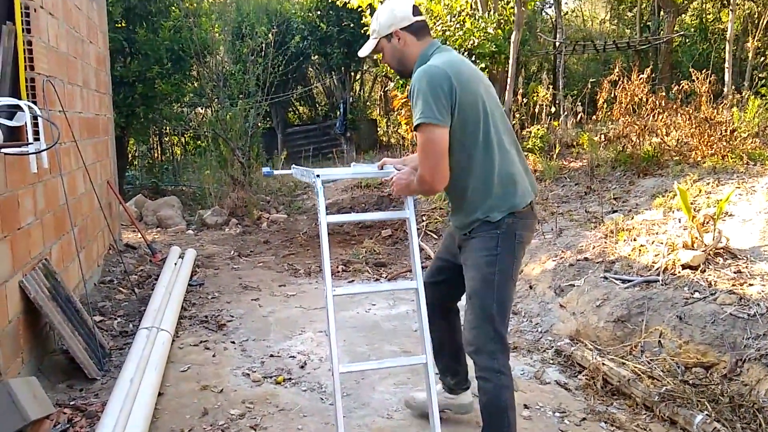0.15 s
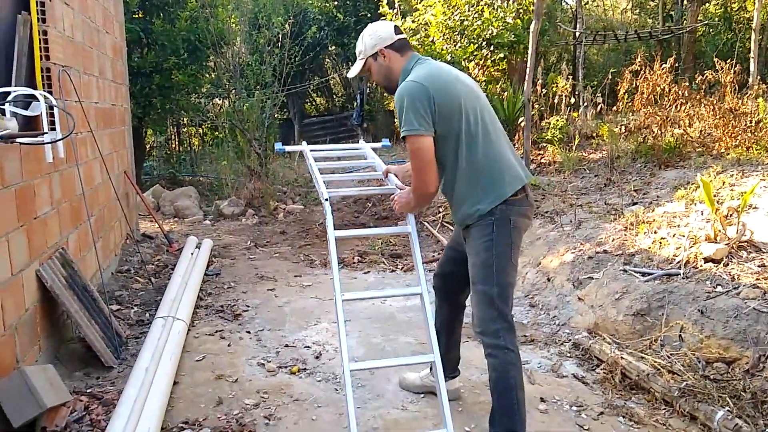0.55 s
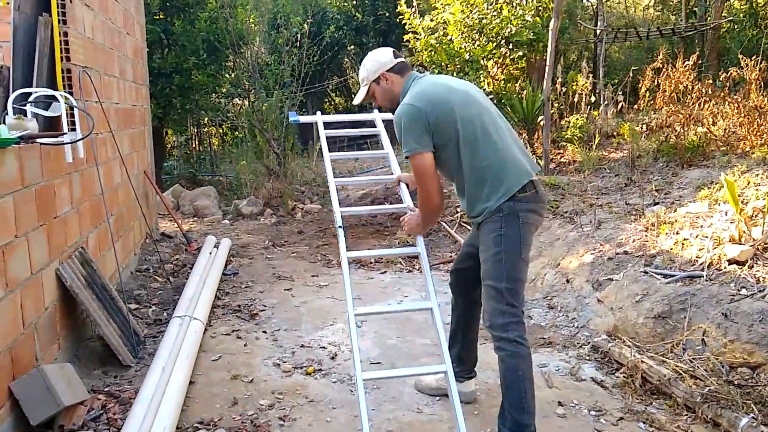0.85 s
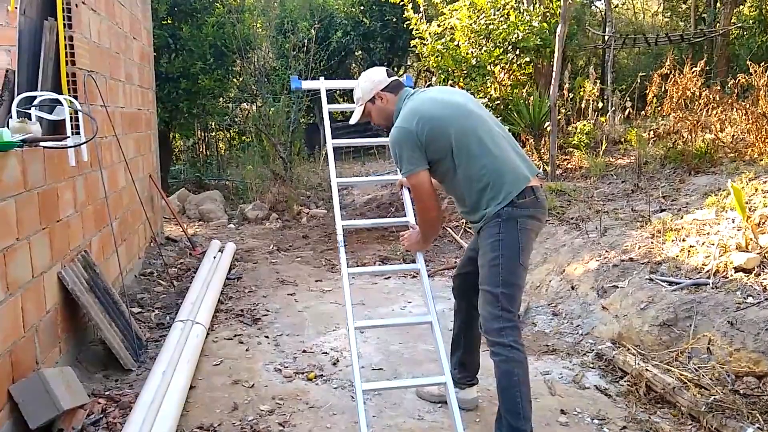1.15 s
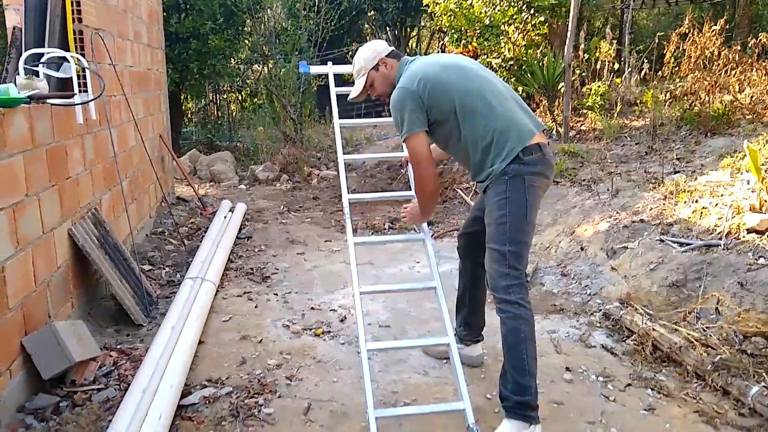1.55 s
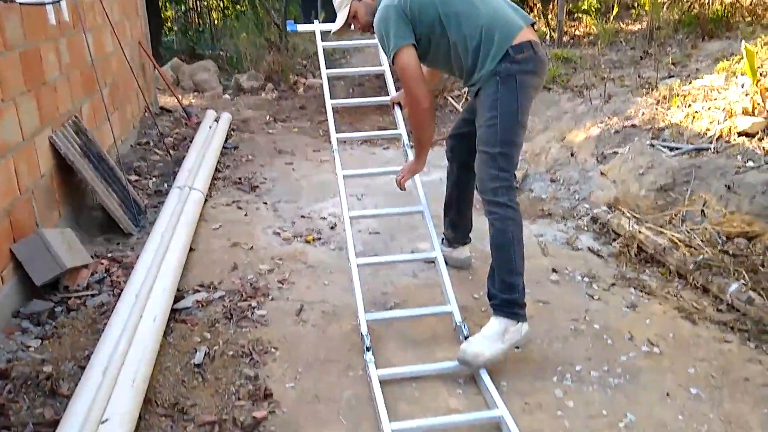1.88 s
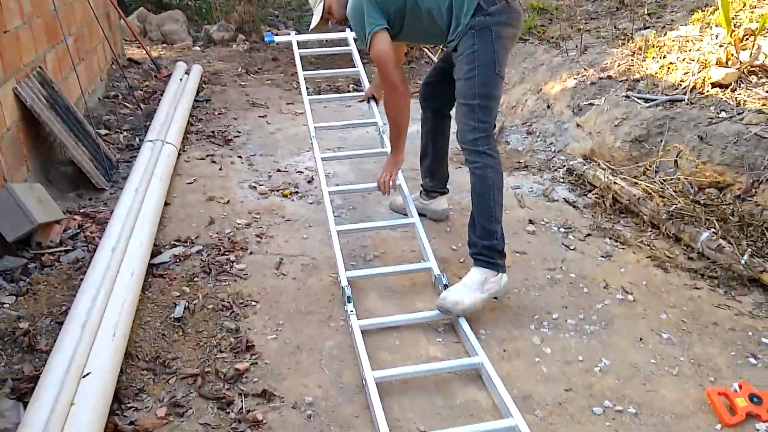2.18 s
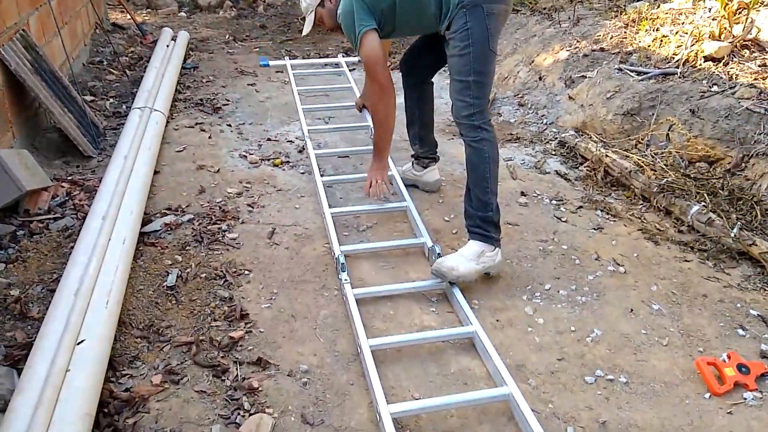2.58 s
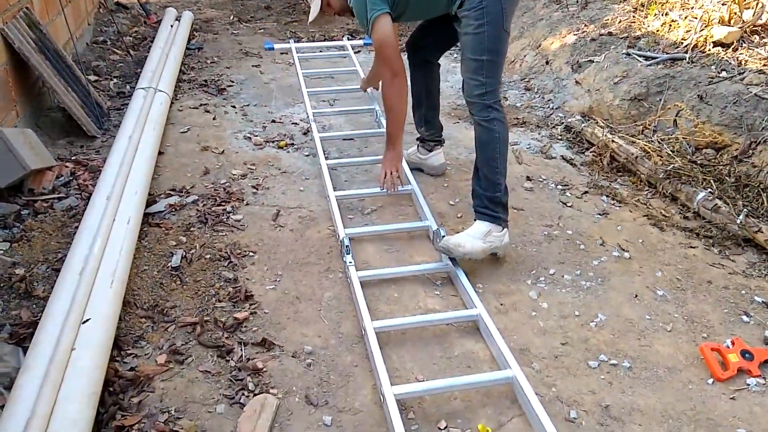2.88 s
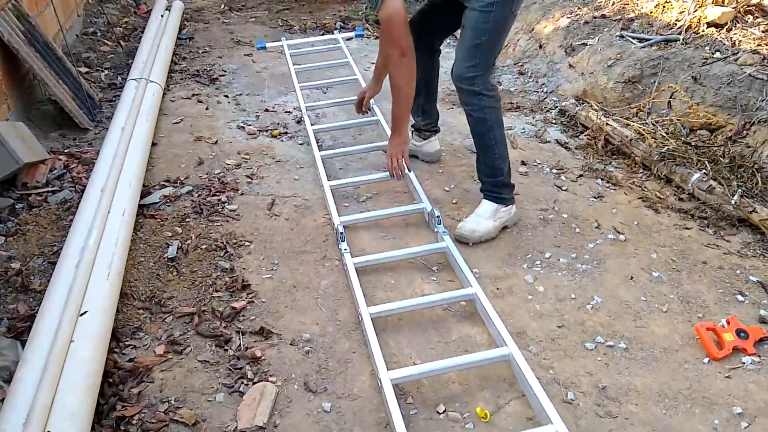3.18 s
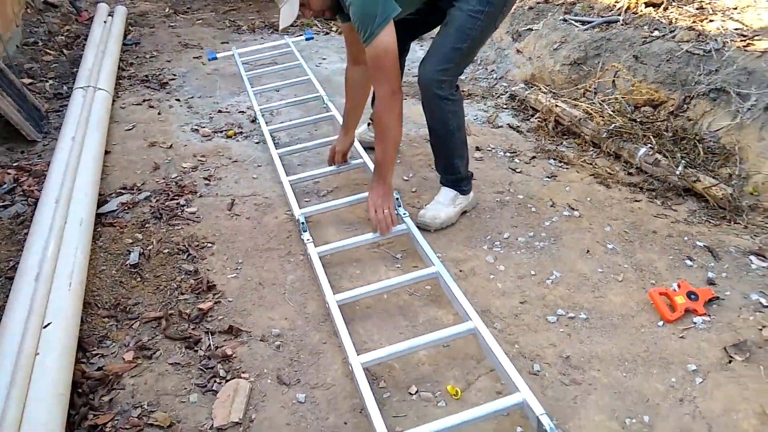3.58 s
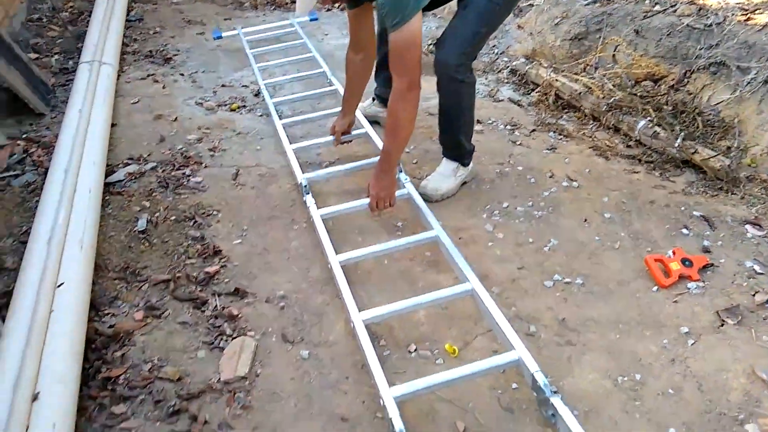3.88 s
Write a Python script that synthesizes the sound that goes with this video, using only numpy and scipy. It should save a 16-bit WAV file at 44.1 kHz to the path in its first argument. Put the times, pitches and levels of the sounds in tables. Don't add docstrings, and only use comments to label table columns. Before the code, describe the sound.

Hinged aluminium ladder unfolding outdoors: sharp metallic slams, latch snaps and loose joint rattles, with dull foot thuds on packed earth.

```python
import sys
import numpy as np
from scipy import signal
from scipy.fft import rfft, irfft, next_fast_len
from scipy.io import wavfile
from scipy.ndimage import uniform_filter1d, map_coordinates

SR = 44100
rng = np.random.default_rng(int(sys.argv[2]) if len(sys.argv) > 2 else 0)


def volts(x):
    e = np.asarray(x, float) / 20
    return 10 ** e


def generate_wav(sig):
    pcm = np.round(np.clip(np.atleast_2d(sig).T, -1, 1) * 32767).astype(np.int16)
    wavfile.write(sys.argv[1], SR, pcm)


N = 177782
LOW_SPLIT_HZ, HIGH_SPLIT_HZ = 1800, 5500


def unit(x):
    return x / np.sqrt(np.mean(x ** 2))


def shape(x, table, sign=1):
    hz, db = np.transpose(table)
    grid_hz = np.maximum(np.arange(N // 2 + 1) * SR / N, 1)
    gain_db = np.interp(np.log(grid_hz), np.log(hz), db)
    return irfft(rfft(x, N) * volts(sign * gain_db), N)


def butter(x, order, hz, kind):
    return signal.sosfilt(signal.butter(order, hz, kind, fs=SR, output="sos"), x)


def bands(x):
    edges = [(LOW_SPLIT_HZ, "low"), ((LOW_SPLIT_HZ, HIGH_SPLIT_HZ), "band"), (HIGH_SPLIT_HZ, "high")]
    return np.array([unit(butter(x, 2, hz, kind)) for hz, kind in edges])


def walk(rate_hz):
    hold = int(SR / rate_hz)
    steps = np.repeat(rng.standard_normal(N // hold + 1), hold)
    return 1.2 * uniform_filter1d(steps, hold)[:N]


# frequency in Hz, density in dB per Hz.
TUBE_COLOUR = [(150, -44.5), (300, -22.5), (550, -8), (1000, -4.5), (1600, 1), (3200, 2), (4200, 5.5),
               (6200, 8), (8000, 0), (10500, -0.5), (13000, -5), (15500, -15.5), (16600, -42.5)]


def impacts(spread_db):
    size = volts(spread_db * rng.standard_normal(N))
    return np.array([bands(shape(size * rng.standard_normal(N), TUBE_COLOUR)) for _ in range(3)])


# start in seconds, treble peak in dB,
# bass re treble in dB, chatter time in ms, ring in dB.
RAIL_CLACKS = [(0.0201, -25.5, -11, 6.5, -10.5), (0.3319, -40.5, 3, 5.5, -1), (0.49, -0.5, -11, 4, -6.5),
               (0.5247, -1.5, -9.5, 3.5, -1.5), (0.9638, -40, -7.5, 5.5, 0), (1.2034, -6, -9, 6.9, -9),
               (1.278, -27, -25, 4.6, -5), (2.279, -40, -11, 3.4, -4.5), (2.4974, -10, -10.5, 9.5, -6.5),
               (2.5132, -13.5, 1, 4.9, -4), (2.657, -22, -9, 5.5, -3.5), (2.6924, -21, -7, 7.9, -5.5),
               (2.996, -23.5, -10, 6.5, -5), (3.0701, -26.5, -11.5, 3.97, -16), (3.3746, -31.5, -1, 4, 4),
               (3.4451, -22, -11, 5.1, -4.5), (3.8145, -26.5, 3.5, 5.6, -5), (3.9819, -8.5, -1, 6.7, -5)]
# start in seconds, treble peak in dB,
# bass re treble in dB, chatter time in ms, ring in dB.
PAWL_DROPS = [
    (0.0935, -31.5, -27, 3.9, -6.5),
    (0.394, -22.5, -15.5, 6.7, -7.5),
    (0.5151, -18.5, -33.5, 3.1, 2),
    (2.573, -17, -22.5, 4.9, -25.5),
    (3.8868, -17.5, -18, 4.2, -9),
    (3.953, -29.5, -28, 4.7, -3),
]
# start in seconds, treble peak in dB,
# bass re treble in dB, chatter time in ms, ring in dB.
LATCH_SNAPS = [(0.3585, -37, -0.5, 5.3, -5.5), (0.4235, -42.5, -6, 3.5, 5.5), (0.7433, -39.5, 0.5, 2, 6),
               (0.8814, -39.5, -11, 3.2, -3.5), (1.1899, -12.5, -3.5, 5.8, -3),
               (1.315, -34.5, -3, 4.2, -4.5), (1.88, -40.5, -5, 5.3, -13.5), (2.0596, -46, -30, 3.97, -15),
               (2.1277, -43.5, -4.5, 3.5, 3), (2.7334, -27, -21, 3.6, -11.5),
               (3.03, -28.5, -12.5, 3.1, -7.5), (3.4295, -20, -14, 6.4, -10), (3.749, -41, -3.5, 2.3, 2),
               (3.7799, -39, 1.5, 14, -5)]
# start in seconds, treble peak in dB, bass re treble in dB.
JOINT_TICKS = [(0.255, -62, -17.5), (0.312, -50, 0), (0.855, -49, -25), (1.0224, -55, -10),
               (1.088, -49, 3.5), (1.3839, -53, -6), (1.496, -72.5, -13.5), (1.5454, -56, -13.5),
               (1.6127, -60.5, -10.5), (1.675, -65, -15.5), (1.722, -56, -9), (1.7836, -65, -21.5),
               (1.858, -58, 4.5), (1.9402, -74, -12), (1.9659, -58, -13), (2.2197, -50, -16),
               (2.3286, -47, -27), (2.4581, -58.5, 5), (2.8803, -73, -14), (2.9173, -62, -19),
               (3.1555, -54, 2), (3.3119, -53.5, -29), (3.5744, -58.5, 3.5), (3.6964, -64.5, -19.5)]


def blows():
    knocks = []
    for table, mid_db in [(RAIL_CLACKS, 0), (PAWL_DROPS, -7), (LATCH_SNAPS, -24.5)]:
        knocks += [(s, db, mid_db, *rest) for s, db, *rest in table]
    tick_mid_db, tick_chatter_ms, tick_ring_db = -9, 5.5, -3.5
    knocks += [(s, db, tick_mid_db, low_db, tick_chatter_ms, tick_ring_db) for s, db, low_db in JOINT_TICKS]
    return sorted(knocks)


# t60 in s of bass, middle, treble.
TUBE_T60_S = (.38, .33, .24)


def tube_ring():
    t = np.arange(next_fast_len(int(.3 * SR))) / SR
    modes = rfft(rng.standard_normal(len(t))) * volts(5.5 * rng.standard_normal(len(t) // 2 + 1))
    octave = np.log2(np.arange(1, len(modes) + 1) * SR / len(t) / LOW_SPLIT_HZ)
    low, high = np.clip(.5 - octave / 2, 0, 1), np.clip(octave / 2 - .3, 0, 1)
    share = np.clip([low, 1 - low - high, high], 0, 1)
    parts = irfft(modes * np.sqrt(share), len(t))
    decay = volts(-60 * t / np.array(TUBE_T60_S)[:, None])
    return (parts / parts.sum(axis=0).std() * decay).sum(axis=0) / np.sqrt(.03 * SR)


GRIPS_S = [.11, .785, 1.36, 2.755, 3.125, 3.21, 3.39, 3.49, 3.85, 3.915, 4.1]


def gripped(s, length):
    grip_t60_s = 0.157
    after_s = np.arange(length) / SR + s - min(g for g in GRIPS_S if g > s)
    return volts(-60 * np.maximum(after_s, 0) / grip_t60_s)


# start in seconds, length in seconds, treble level in dB,
# change over the spell in dB, bass re treble in dB.
SHAKE_SPELLS = [(0.004, 0.097, -64, -11, 16.5), (0.113, .17, -73, 1.5, 6.5), (0.316, .14, -64, 8, 1.5),
                (.465, 0.16, -44, -1, 4.5), (0.661, 0.12, -49, -3.5, -3), (0.853, 0.32, -61, -1.5, 2),
                (1.214, .16, -70.5, -4, 6.5), (1.549, 0.27, -79.5, 7.5, 4), (1.845, .04, -73, -1.5, 15.5),
                (1.91, .43, -67, 3.5, 0), (2.434, 0.06, -81, 8, 21), (2.525, 0.18, -68, 14.5, 6.5),
                (2.792, 0.159, -71.5, 4, -7), (2.999, 0.091, -64, -3, 15), (3.136, 0.059, -60.5, 0, 3.5),
                (3.425, 0.06, -60, -3, 8), (3.504, 0.13, -63, -12, -1.5), (3.685, 0.065, -67.5, 13.5, 0.5),
                (3.75, 0.092, -52, 7, 3.5), (3.891, 0.11, -63, 8.5, 10.5)]


def shaking():
    attack_s, release_s = 0.0052, 0.033
    t, power = np.arange(N) / SR, np.zeros((3, N))
    for s, length_s, db, change_db, low_db in SHAKE_SPELLS:
        gate = np.clip((t - s) / attack_s, 0, 1) * np.exp(-np.maximum(t - s - length_s, 0) / release_s)
        drift_db = change_db * np.clip((t - s) / max(length_s, .01), 0, 1)
        mid_db = -1.5 + 0.19 * low_db
        colour_db = np.array([[low_db], [mid_db], [0]])
        power += (gate * volts(db + drift_db) * volts(colour_db)) ** 2
    return np.sqrt(power)


def ladder():
    chatter, rattle = impacts(4.5), impacts(7.5)
    out = np.zeros((3, N + SR))
    for s, db, mid_db, low_db, ms, ring_db in blows():
        i = int((s - .003) * SR)
        u = np.arange(min(int(.06 * SR), N - i)) / (max(ms, .5) * SR / 1000)
        swell = (u * np.exp(1 - u)) ** 1.2
        band_db = db - 6.5 + np.array([low_db, mid_db, 0])
        burst = swell * (volts(band_db) @ chatter[:, :, i:i + len(u)])
        out[:, i:i + len(u)] += burst
        ring_gain = volts(np.clip(ring_db, -30, 2.5))
        ring = ring_gain * signal.fftconvolve(burst, tube_ring()[None], axes=1)
        out[:, i:i + ring.shape[1]] += ring * gripped(s, ring.shape[1])
    jolts_db = 3.2 * walk(80) + 2.2 * np.array([walk(45) for _ in range(3)])
    shake = (volts(jolts_db) * shaking() * rattle).sum(axis=1)
    held_n = int(.04 * SR)
    held = tube_ring()[:held_n] * np.linspace(1, 0, held_n)
    held_ring = signal.oaconvolve(shake, held[None] / np.linalg.norm(held), axes=1)[:, :N]
    return out[:, :N] + .75 * shake + .65 * held_ring


# start in seconds, frequency in Hz, level in dB, t60 in seconds.
RUNG_PINGS = [(0.018, 2480, -38.5, 0.11), (.02, 7500, -33, 0.048), (.152, 3700, -69.5, 0.59),
              (.25, 2660, -65, 0.38), (.26, 1600, -57, 0.17), (.488, 1584, -20.5, 0.16),
              (0.53, 3800, -29.5, 0.24), (0.53, 3900, -36.5, 0.8), (.525, 4100, -47.5, 0.25),
              (.525, 2383, -28.5, 0.17), (.525, 6000, -21, 0.13), (.522, 5400, -20.5, 0.11),
              (.55, 1900, -33.5, 0.25), (.55, 2035, -38.5, 0.5), (0.641, 1830, -52.5, 0.75),
              (1.305, 1600, -43.5, 0.21), (1.212, 6500, -42.5, 0.3), (0.84, 1370, -66.5, 0.39),
              (2.498, 1040, -27.5, 0.2), (2.505, 1640, -27.5, 0.16), (2.61, 1680, -43.5, 0.3),
              (3.07, 730, -38, 0.17), (3.036, 920, -46, 0.21), (2.206, 1060, -56.5, 0.064),
              (3.16, 1640, -55, 0.16), (3.4, 1530, -56, 0.15), (3.76, 3000, -42, 0.12),
              (3.957, 1640, -34.5, 0.6), (3.985, 820, -33.5, 0.4), (3.989, 1482, -33, 0.21)]


def rungs():
    out = np.zeros((2, N + SR))
    t = np.arange(int(.4 * SR)) / SR
    for s, hz, db, t60_s in RUNG_PINGS:
        flutter = 1 + .75 * unit(uniform_filter1d(rng.standard_normal((2, len(t))), 400))
        turns = np.cumsum(rng.random((2, 1)) * [[1], [.35]], axis=0)
        decay = (1 - np.exp(-t / .004)) * volts(db - 60 * t / t60_s)
        tone = decay * flutter * np.sin(2 * np.pi * (hz * t + turns))
        i = int(s * SR)
        out[:, i:i + len(t)] += tone * gripped(s, len(t))
    return out[:, :N]


# start in seconds, peak in dB, frequency in Hz, rumble in dB,
# left minus right in dB.
GROUND_THUDS = [(0.059, -36.5, 295, -64, -1), (0.329, -44.5, 386, -75, -0.5), (0.359, -46, 103.5, -54, 2),
                (0.488, -37.5, 76.9, -55, -28), (0.525, -36.5, 68, -57, -25), (1.188, -46.5, 220, -60, -16),
                (1.257, -53, 100.9, -53, -5.5), (1.741, -54, 167, -79, 1), (2.139, -52, 304, -73, 1),
                (2.197, -49, 147, -68, 3), (2.489, -47.5, 290.6, -53.5, 0), (2.701, -42, 328.4, -57, 11),
                (2.83, -46.5, 154, -78, 2.5), (3.067, -48.5, 270, -57, -4), (3.172, -36, 280, -62.5, -0.5),
                (3.411, -35, 453, -57.5, -4.5), (3.785, -44.5, 230, -50, -2.0), (3.977, -43, 295, -53, 5),
                (0.61, -57, 98, -56.5, -15), (3.195, -43.5, 179.6, -76, -1.5), (3.812, -34, 245, -59, -3),
                (1.36, -62, 110, -77, -5), (1.82, -60.5, 128, -80, -2.5), (1.0, -60, 128, -74, 0)]


def weight():
    rest_db, t60_s, rise_s = -80.5, .36, .015
    t = np.arange(N) / SR
    gain = np.full(N, volts(rest_db))
    for s, _, _, db, _ in GROUND_THUDS:
        gain += volts(db - 60 * np.maximum(t - s, 0) / t60_s) * np.exp(np.minimum(t - s, 0) / rise_s)
    return gain


def ground():
    out = np.zeros((2, N + SR))
    t = np.arange(int(.25 * SR)) / SR
    for s, db, hz, _, pan_db in GROUND_THUDS:
        soil = butter(rng.standard_normal(len(t)), 1, (hz / 1.7, hz * 1.7), "band")
        t60_s = .045 + 2.2 / hz
        decay = (1 - np.exp(-t / .004)) * volts(db - 60 * t / t60_s)
        blow = (.5 * unit(soil) + .65 * np.sin(2 * np.pi * hz * t)) * decay
        i = int(s * SR)
        out[:, i:i + len(t)] += volts(np.array([[.5], [-.5]]) * pan_db) * blow
    rumble = butter(rng.standard_normal((2, N)), 2, (55, 400), "band")
    return out[:, :N] + volts(-5.0) * weight() * unit(rumble)


# start in seconds, length in seconds, start in Hz, end in Hz, level in dB.
BIRD_CALLS = [
    (2.791, .09, 8700, 8020, -72.5),
    (3.513, .14, 6860, 6560, -71),
]


def bird():
    out = np.zeros(N)
    for s, length_s, start_hz, end_hz, db in BIRD_CALLS:
        n, i = int(length_s * SR), int(s * SR)
        waver = 1 + .7 * unit(uniform_filter1d(rng.standard_normal(n), 200))
        phase = 2 * np.pi * np.cumsum(np.linspace(start_hz, end_hz, n)) / SR
        out[i:i + n] = volts(db) * np.hanning(n) ** .5 * waver * np.sin(phase)
    return out


# frequency in Hz, density in dB per Hz.
YARD_COLOUR = [(20, -24), (40, -6), (100, 4), (300, -3), (1500, -2), (2600, -6), (5500, -8), (8500, -9),
               (10700, -8), (13000, -12), (15500, -12), (16500, -22)]


def yard():
    shared, left, right = (unit(shape(rng.standard_normal(N), YARD_COLOUR)) for _ in range(3))
    return volts(-71.5 + 1.3 * walk(15)) * (.5 * shared + .85 * np.array([left, right]))


# time in seconds, left minus right in dB.
LADDER_SIDE = [(0.0, 2), (0.16, 0.5), (0.31, -3.5), (0.64, 1.5), (1.12, -3.5), (1.45, -1), (3.57, -1),
               (4.03, -4.5)]


def scene():
    shared_power, left_lag_samples = .33, 11.8
    s, side_db = np.transpose(LADDER_SIDE)
    pan_db = np.interp(np.arange(N) / SR, s, side_db)
    common, *apart = ladder()
    common = np.sqrt(shared_power) * common + bird()
    late = map_coordinates(common, [np.arange(N) - left_lag_samples], order=1)
    near = np.array([late, common]) + np.sqrt(1 - shared_power) * np.array(apart) + rungs()
    pan = volts(np.array([.5, -.5])[:, None] * (pan_db - pan_db.mean()))
    return near * pan + ground() + yard()


def top_cut(x):
    return signal.sosfilt(signal.butter(12, 16790, fs=SR, output="sos"), x)


# frequency in Hz, left minus right in dB.
PORT_COLOUR = [(60, -2), (1400, 0), (2400, 5), (3400, -1), (4400, -2), (5900, 2.5), (7500, -3), (9000, -10),
               (10800, -15), (12500, -7), (15500, -4)]


def record(dry):
    ports = np.array([shape(dry[0], PORT_COLOUR, sign=.5), shape(dry[1], PORT_COLOUR, sign=-.5)])
    ports = butter(ports, 1, 35, "high")
    return top_cut(np.tanh(ports))


dry = scene()
out = record(dry)
generate_wav(out)
```